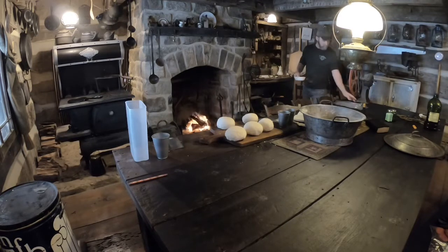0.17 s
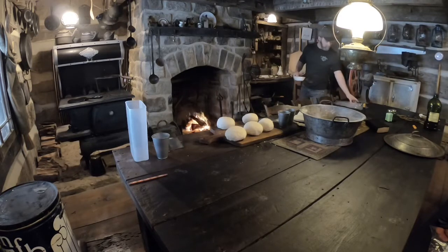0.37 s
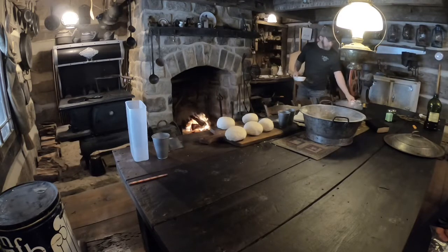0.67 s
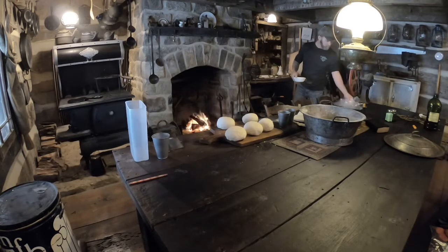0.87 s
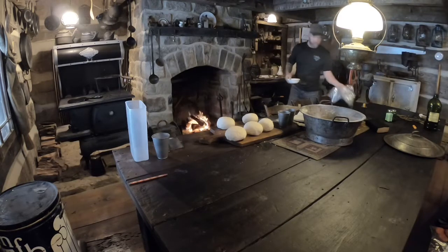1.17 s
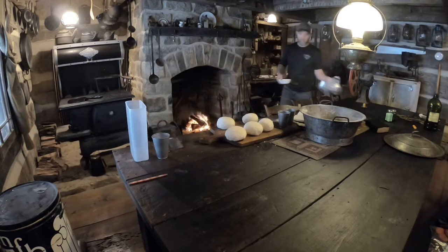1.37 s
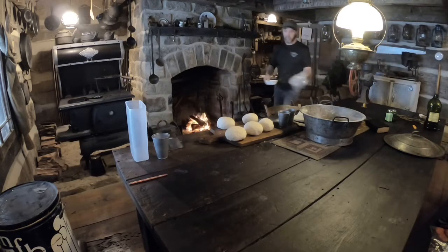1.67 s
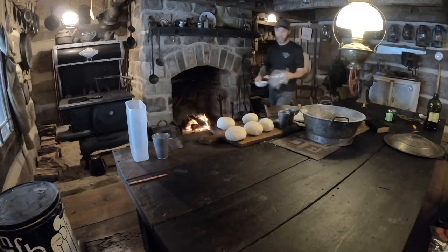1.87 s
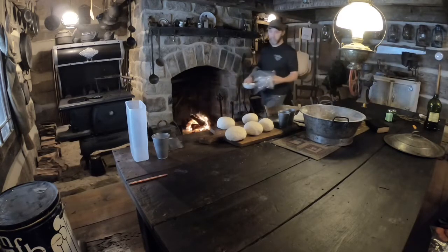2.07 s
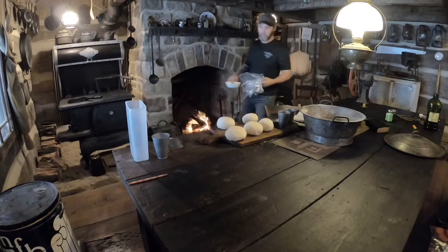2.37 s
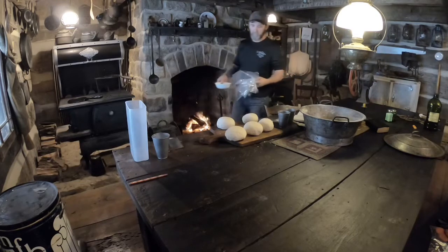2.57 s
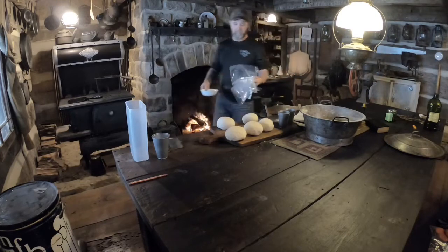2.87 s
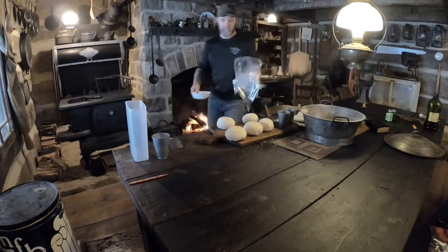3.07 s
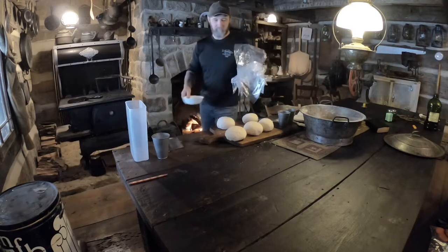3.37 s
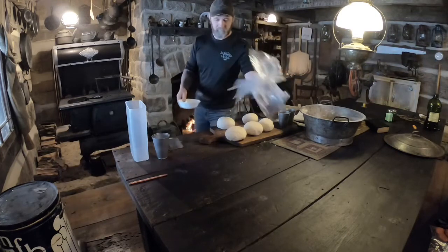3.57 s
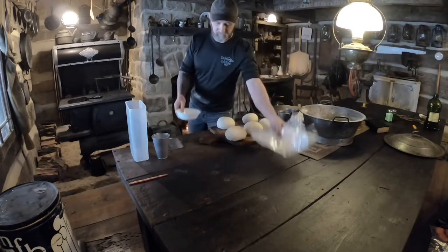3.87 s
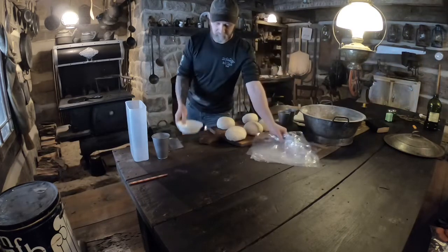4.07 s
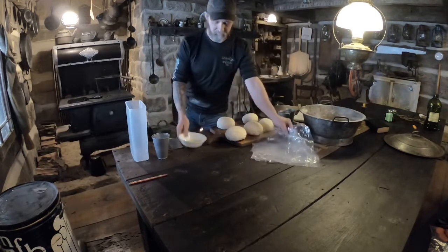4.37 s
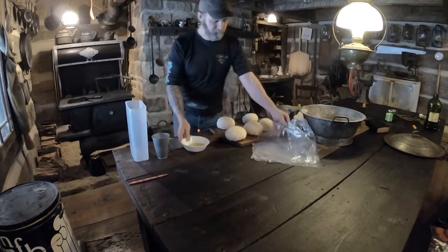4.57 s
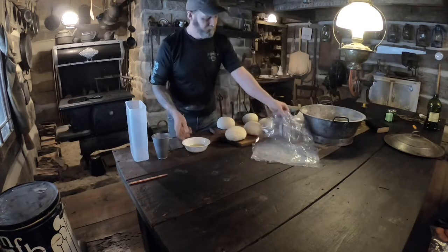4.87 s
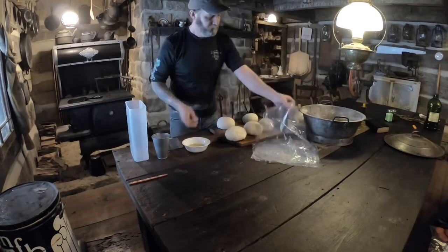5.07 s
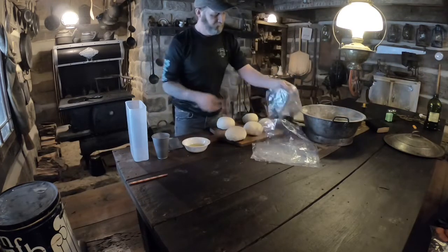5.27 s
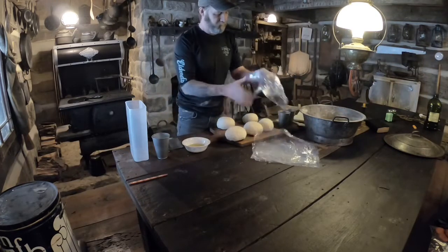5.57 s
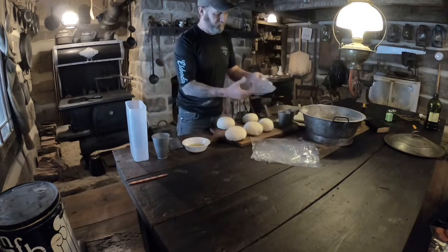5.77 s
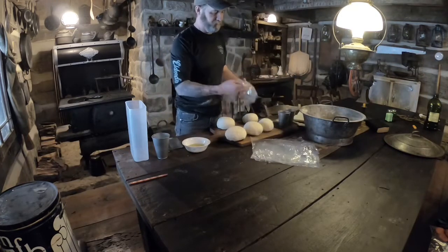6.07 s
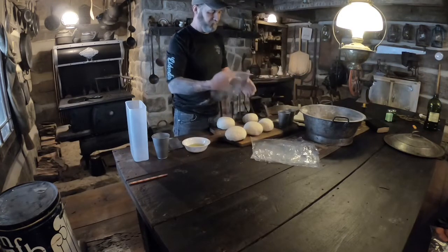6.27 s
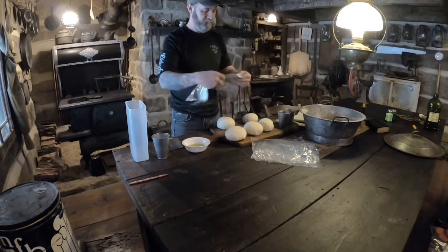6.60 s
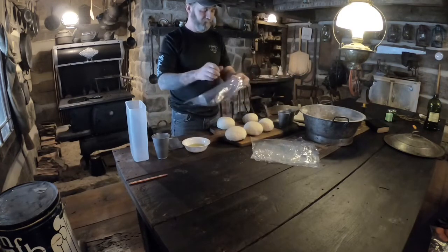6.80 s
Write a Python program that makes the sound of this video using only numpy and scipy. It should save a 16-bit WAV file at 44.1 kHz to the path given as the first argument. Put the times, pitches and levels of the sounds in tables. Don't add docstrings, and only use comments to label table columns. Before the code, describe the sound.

Faint plastic crackle and quiet steps on boards come first, then heavier creaking footfalls with low floor thumps, a barely audible cricket ticking between them. Midway a bowl hits the wooden table very near the microphone, by far the loudest sound, clattering briefly as it settles while the stone room answers with a short tail. Then film is crinkled and tugged in irregular bursts, nearer and crisper towards the end.

```python
import sys
import numpy as np
from scipy import signal
from scipy.fft import rfft, irfft
from scipy.io import wavfile
from scipy.ndimage import uniform_filter1d

SR = 44100
rng = np.random.default_rng(int(sys.argv[2]) if len(sys.argv) > 2 else 0)


def pcm_store(signal):
    levels = np.round(np.clip(np.atleast_2d(signal), -1, 1) * 32767)
    wavfile.write(sys.argv[1], SR, levels.astype(np.int16).T)


def natural_amplitude(level_db):
    exponent = np.asarray(level_db, float) / 20
    return 10 ** exponent


N = 305877

# (time [s], creak level [dB], scuff level [dB], fall per 20 dB [s])
ROLLS = [(0.36, -61.5, -60, 1), (0.831, -57, -85, -0.5), (1.158, -42.5, -65, 0.17),
         (1.33, -50.5, -64.5, 0.57), (1.883, -49, -68, 0.2), (1.952, -45, -80, 0.5),
         (2.032, -32, -49, -0.28), (2.1, -38, -65, -0.56), (2.692, -40.5, -68, 0.05),
         (2.771, -32.5, -58, 0.19), (2.94, -72, -57.5, -1), (3.399, -46, -74, -0.16),
         (3.49, -45, -59, 0.18), (3.561, -54, -75, 0), (3.9, -54.5, -68, 0.2), (4.08, -54.5, -66.5, 0.35),
         (4.497, -45.5, -53.5, 0.56), (4.96, -42.5, -71.5, 0.03)]
ROLL_RISE_S, CREAK_REST_DB, SCUFF_REST_DB = 0.055, -64.5, -74
# (frequency [Hz], width [Hz], level [dB])
BOARDS = [(152.7, 31, 2.5), (175.4, 61, -9), (230, 79, -12)]
# (frequency [Hz], density [dB per Hz])
SCUFF_SPECTRUM = [(180, -30.5), (270, 14.5), (400, 7), (550, 1.5), (800, 9), (1100, -10.5), (1600, -37)]
# (time [s], peak level [dB], ring [s], tilt [dB per octave])
HEELS = [(0.538, -39, 0.39, 3), (0.566, -40.5, 0.45, 4), (0.605, -51, 0.18, 1), (0.781, -50.5, 0.55, 3.5),
         (1.143, -50.5, 0.43, 6), (1.306, -43, 0.34, 3), (1.32, -49.5, 0.33, 8), (1.342, -41.5, 0.19, 3),
         (1.433, -49, 0.31, -8.5), (1.958, -45.5, 0.49, 10), (2.01, -36, 0.38, 6),
         (2.044, -38.5, 0.29, 1.5), (2.105, -46, 0.55, 7), (2.762, -26, 0.28, 6), (2.8, -32, 0.32, 5),
         (2.844, -48, 0.23, 17), (2.922, -47.5, 0.56, 7.5), (3.349, -46.5, 1, 6.5), (3.449, -41, 0.26, 5.5),
         (3.474, -43.5, 0.27, 5), (3.52, -47, 0.31, 4.5), (4.067, -48.5, 0.4, 7.5)]
HEEL_CONTACT_MS = 0.77
# (frequency [Hz], level [dB per Hz])
PLANKS = [(88, -41), (150, -5.5), (210, -6), (278, -2), (373, -17), (981, -31), (1570, -35.5), (1690, -41),
          (5000, -52), (6500, -86), (11000, -120)]
# (time [s], level [dB],
# frequency [Hz], t60 [s])
THUMPS = [(1.089, -39.5, 82.4, 0.48), (1.158, -43, 90, 0.14), (1.956, -39.5, 98, 0.29),
          (1.988, -29, 127, 0.095), (2.04, -26.5, 99, 0.28), (2.096, -32.5, 65, 0.25),
          (2.666, -35, 115, 0.26), (2.763, -23.5, 140.3, 0.29), (2.809, -29, 61.3, 0.22),
          (4.512, -30, 127.4, .3), (4.551, -25, 130, 0.3), (4.688, -23.5, 152, 0.087),
          (4.956, -40, 70.8, 0.84)]
THUMP_LAG_RAD = 1

# (time [s], sway level [dB], joist thud level [dB], rise per 20 dB [s], fall per 20 dB [s])
LOADS = [(0.0, -55, -59.5, .1, 2.7), (1.17, -48.5, -38.5, 0.055, 0.25), (1.36, -48.5, -44.5, .06, 0.31),
         (1.51, -45.5, -46.5, 0.11, 0.31), (2.012, -42, -35, 0.088, 0.58), (2.13, -36, -33.5, .15, 0.14),
         (2.209, -36, -37.5, 0.043, 0.092), (2.275, -43, -56, 0.045, 0.14), (2.72, -42, -35, 0.029, 0.82),
         (2.857, -33.5, -31, 0.11, 0.16), (2.95, -48, -37.5, .1, 0.27), (3.36, -34.5, -51, 0.059, 0.27),
         (3.52, -37.5, -37.5, 0.14, 0.19), (3.73, -39, -64, 0.11, 0.13), (4.49, -58, -51, .1, .1),
         (4.55, -44, -30.5, 0.043, 0.7), (4.697, -33.5, -50, .06, .05), (4.799, -56, -46.5, .1, 0.16),
         (4.998, -37.5, -28, 0.1, 0.38), (5.11, -31, -36, 0.14, 0.049), (5.2, -39.5, -65, .06, 0.26),
         (5.41, -48, -68, 0.073, 0.05), (6.84, -53.5, -77, .1, .05)]
THUD_FALL_SHARE, SWAY_REST_DB, THUD_REST_DB = 0.4, -72.5, -69.5
# (frequency [Hz], density [dB per Hz])
SWAY_SPECTRUM = [(10, -18), (18, 12), (35, 10), (52, -0.5), (70, -51.5)]
# (frequency [Hz], density [dB per Hz])
JOIST_SPECTRUM = [(40, -33.5), (58, 5), (70, 5), (90, 0), (115, -2), (150, -31)]

# (time [s], crackle level [dB], low/high
# tilt [dB], rise per 20 dB [s], fall per 20 dB [s])
GRASPS = [(0.0, -72, 0, .1, 0.13), (0.4, -58, -3, 0.14, 0.8), (0.631, -56, 3.5, 0.18, 0.055),
          (0.95, -60.5, -2, 0.64, 0.46), (1.45, -70.5, 8, 0.53, 0.3), (1.89, -70.5, 4.5, 0.14, 0.28),
          (1.991, -58.5, 8.5, 0.08, 0.1), (2.1, -65.5, 6, 0.054, 0.24), (2.927, -59, 5, 0.25, 0.11),
          (3.28, -60.5, 4, 0.034, 0.35), (3.5, -65.5, 0.5, 0.34, 0.99), (3.921, -58, -1.5, 0.12, 0.5),
          (4.25, -61, -1, 0.094, 0.082), (4.5, -60, -6, 0.31, 0.38), (4.62, -62.5, 8.5, 0.29, 0.17),
          (4.819, -61, 2.5, 0.36, 0.21), (4.97, -64, -2, 0.16, 0.67), (5.149, -60, -6.5, 0.088, 0.45),
          (5.399, -67.5, -4.5, 0.056, 0.44), (5.78, -59, -5.5, 0.12, 0.2), (6.05, -60.5, -8.5, 0.25, 0.52),
          (6.43, -62.5, 0, 0.058, 0.46), (6.59, -56.5, -4, 0.15, 0.39), (6.92, -56.5, -2, 0.17, 0.2)]
FILM_REST_DB, FILM_REST_TILT_DB = -75, -6
# (time [s], peak level
# [dB], tail t60 [s], low/high tilt [dB])
CREASES = [(0.259, -70.5, 0.6, 8), (0.345, -63, 0.3, 1), (0.781, -61, 0.54, 2), (1.2088, -63, 0.1, -3),
           (1.292, -64, .06, 3), (1.432, -63, 0.19, 11.5), (1.465, -61, 0.078, -6), (1.869, -54, 0.3, 4),
           (1.9624, -53.5, 0.13, -4), (2.762, -67.5, 0.36, 19), (2.925, -60, 0.04, -5),
           (3.258, -64.5, 0.24, 12), (3.345, -67.5, 0.63, 11.5), (3.444, -67.5, 0.28, 21.5),
           (3.485, -83, 0.21, 14), (3.741, -68, 0.056, -5), (3.783, -60, 0.24, -4), (3.872, -70, 0.052, -4),
           (3.901, -54.5, 0.46, -2), (4.337, -61, 0.04, -2.5), (4.3755, -68, 0.054, 5),
           (4.412, -58, 0.15, 3), (4.505, -40.5, 0.046, -11), (4.801, -57, 0.19, 9.5),
           (5.136, -49, 0.073, -25), (5.157, -56, 0.061, 1), (5.224, -58, 0.26, 3.5),
           (5.2976, -64.5, 0.08, -4), (5.399, -58, 0.06, 0), (5.576, -70.5, .05, -15),
           (5.662, -80, 0.06, 8), (5.689, -65, .08, 3), (5.7517, -60.5, 0.13, -3), (5.811, -55.5, 0.18, 1),
           (5.874, -57, 0.05, -10), (5.9232, -73, 0.076, 2), (5.9671, -59, 0.06, -12),
           (6.02, -50, 0.054, -8), (6.1257, -59.5, 0.38, -3), (6.217, -62, 0.26, 0.5),
           (6.295, -67, 0.04, -2.5), (6.4165, -55, 0.3, -1), (6.572, -51, 0.14, -8),
           (6.666, -58, 0.18, 2.5), (6.7942, -63, 0.06, 5), (6.8584, -57.5, 0.06, 3), (6.882, -52, 0.27, 3)]
CREASE_RISE_S = 0.0017
# (frequency [Hz], density [dB per Hz])
FILM_HIGH = [(1470, -8.5), (2500, -11), (3270, -7), (4540, -7), (5270, -5), (6160, 0), (6840, 0.5),
             (7800, -6.5), (8250, -14.5), (9300, -19), (12900, -23.5), (13900, -38), (14800, -58)]
# (frequency [Hz], density [dB per Hz])
FILM_LOW = [(400, 2.5), (800, 5), (1500, 0.5), (2200, -1.5), (3300, -4.5), (4200, -12.5), (6000, -43)]
# (time [s], gain above 10 kHz [ratio, 1 = unchanged])
NEARNESS = [
    (0, 0.4),
    (1.9, 0.5),
    (2.2, 0.1),
    (3.0, 0),
    (3.8, 0.5),
    (4.1, 1.07),
    (4.6, 0.3),
    (6.4, 0.6),
    (6.7, 1.3),
]
# (time [s], level [dB], frequency [Hz])
POPS = [(0.565, -53, 790), (0.789, -60, 1270), (1.148, -65, 857), (1.308, -61.5, 844), (1.441, -60, 1990),
        (1.878, -56, 693), (1.875, -58.5, 1160), (2.011, -52, 1013), (2.7, -66.5, 1690),
        (3.448, -49.5, 1524), (3.925, -61, 1200), (4.075, -61.5, 680), (4.732, -50, 1108),
        (4.816, -65, 2380), (4.836, -54, 3310), (5.139, -58, 3200), (5.158, -56, 3300), (5.228, -62, 3070),
        (6.882, -51.5, 2910), (6.9, -58.5, 1590)]
POP_T60_S = 0.17

# (time [s], blow level [dB], contact [ms], share reaching bowl [dB])
BLOWS = [(4.5045, -1, 0.24, -6), (4.510, -3, 0.25, 3.5), (4.516, -14.5, 0.33, -6),
         (4.525, -16.5, 0.44, -13), (4.545, -12.5, 0.28, -21), (4.577, -16, 0.24, -29),
         (4.609, -23, 0.4, -24), (4.6865, -14.5, 1, -16), (4.704, -27, 0.72, -18), (4.730, -14, 0.9, -35),
         (4.742, -35, 0.6, -29), (4.767, -27, 1.3, -31), (4.795, -42, 0.99, -33)]
TABLE_DB, BOWL_DB, THUD_DB = -19, -26, -15.5
# (frequency [Hz], level [dB], t60 [s])
TABLE_MODES = [(422, -6, 0.13), (453, -5, 0.17), (560, -14.5, 0.14), (600, -10, 0.2), (680, -15, 0.2),
               (700, 6, 0.2), (830, -4, 0.23), (917, -13.5, 0.099), (1086, -1, 0.088), (1243, -20, 0.13),
               (1285, -7.5, 0.14), (1375, -9.5, 0.085), (1780, -33.5, 0.25), (2114, -36, 0.28)]
# (frequency [Hz], level [dB], t60 [s])
BOWL_MODES = [(3350, -28, 0.04), (3503, -18, 0.12), (3593, -16.5, 0.068), (3730, -28, 0.033),
              (5880, -44, 0.058), (6070, -17, 0.06), (7400, -24, .05), (9600, -30, .02), (11800, -37, .015)]
# (frequency [Hz], level [dB per Hz])
THUD = [(200, -29), (350, -6.5), (600, 7), (900, -1.5), (1250, -9), (1500, -14.5), (2000, -24),
        (2600, -39.5), (5000, -50)]
# (frequency [Hz], level [dB], t60 [s])
PAN_MODES = [(636, -47, 1.1), (682, -57, .3), (828, -58, .4)]
# (frequency [Hz], width [Hz], level [dB])
TABLE_TOP = [(128, 120, -7.5), (184, 82, -10), (219, 10, -2), (254, 7.5, 3), (300, 14, -8.5),
             (377, 18, -12)]
SHUDDER_DB, SHUDDER_SHARE, SHUDDER_FALL_S = -24, 0.39, 0.076
# (time [s], level [dB], frequency [Hz], t60 [s])
KNOCKS = [(4.505, -15.5, 187, 0.043), (4.522, -22, 255, .06), (4.54, -28, 200, 0.065),
          (4.556, -17.5, 247, .06), (4.576, -23, 236, 0.08), (4.613, -29, 250, 0.062),
          (4.632, -26.5, 125, 0.062), (4.689, -25, 300, 0.043), (4.694, -24, 170, 0.069),
          (4.704, -25, 371, 0.066), (4.727, -28.5, 242, .07), (4.747, -24, 274.5, 0.036),
          (4.764, -28.5, 218, 0.05), (4.796, -31, 226, 0.086)]
KNOCK_CONTACT_MS = 1.57

CHIRPS = [1.714, 1.795, 1.8401, 1.9862, 2.035, 2.086, 2.3793, 2.442, 2.541, 2.5833, 2.6297, 2.674, 2.7144,
          2.7829, 2.824, 2.8762, 3.006, 3.0455, 3.128, 3.17, 3.2109]
CHIRP_HZ, CHIRP_MS, CHIRP_DB, CHIRP_SCATTER_DB = 6760, 1, -64, 1
# (frequency [Hz], density [dB per Hz])
AIR_SPECTRUM = [(11, -38), (18, -19.5), (57, -6.5), (118, -48), (161, -12), (191, -6), (354, -23),
                (419, -22), (799, -12.5), (1060, -21.5), (1480, -27.5), (2320, -42), (3400, -53),
                (5250, -47), (6950, -41), (14800, -45)]
AIR_DB = -63
ROOM_T60_S, ROOM_DB = 0.64, -6.5

# (frequency [Hz], common share [0-1])
LIKENESS = [(30, 0.44), (130, 0.31), (250, 0.085), (450, 1), (700, 0.84), (1100, 0.88), (2100, 0.23),
            (3500, 0.77), (6500, 0.1), (12000, 0.034)]
# (frequency [Hz], phase [rad], level [dB])
PORT_DIRECT = [(130, 0, 0), (200, 0, -5), (420, 0, -4), (510, -1.6, -5), (600, -3.6, -9), (700, -4.1, -5.5),
               (830, -4.5, -3), (950, -4.3, 0), (2100, -4.6, 2), (3500, -6.2, .5), (6000, -5.7, -2),
               (12000, -6.3, 0)]
# (frequency [Hz], phase [rad], level [dB])
PORT_DIFFUSE = [(130, 0, -1), (300, -3.2, -2), (1100, -3.4, -.5), (2100, -4.6, 2), (3500, -6.1, 0),
                (6000, -5.7, -3), (12000, -6.3, 0)]


def unit(x):
    return x / np.sqrt(np.mean(x ** 2))


def on_log(points, size):
    hz, value = np.transpose(points)
    return np.interp(np.log(np.fft.rfftfreq(size, 1 / SR) + 1), np.log(hz), value)


def colour(x, points):
    size = x.shape[-1]
    return irfft(rfft(x) * natural_amplitude(on_log(points, size)), size)


def ports(common, own):
    size = common.shape[-1]
    like = np.clip(on_log(LIKENESS, size), 0, 1)
    return irfft(np.sqrt(like) * rfft(common) + np.sqrt(1 - like) * rfft(own), size)


def noise():
    x = rng.standard_normal((3, N))
    return ports(x[0], x[1:])


def curves(table):
    s, *columns = np.transpose(table)
    return [np.interp(np.arange(N) / SR, s, c) for c in columns]


def add(out, s, x):
    i = int(s * SR)
    out[..., i:i + x.shape[-1]] += x[..., :N - i]


def decay(t, t60_s):
    return np.exp(-np.log(1000) * t / t60_s)


def ring(hz, db, t60_s, contact_ms, phase):
    t = np.arange(SR // 2 * 3)[:int(min(np.max(t60_s), 1.4) * SR)] / SR
    wave = np.sin(2 * np.pi * hz[:, None] * t + phase[:, None])
    modes = natural_amplitude(db)[:, None] * decay(t, t60_s[:, None]) * wave
    push = np.hanning(int(contact_ms * SR / 1000) + 3)
    return signal.fftconvolve(modes.sum(0), push / push.sum())


def dense(points, db, contact_ms, ring_s, tilt_db, count=90):
    out = np.zeros((3, SR // 2 * 3))
    point_hz, point_db = np.transpose(points)
    for row in out:
        u = rng.random((3, count))
        hz = 140 * 36 ** ((np.arange(count) + u[0]) / count)
        mode_db = np.interp(np.log(hz), np.log(point_hz), point_db)
        mode_db = mode_db + (6.5 + tilt_db) * np.log2(hz / 300)
        t60_s = max(ring_s, .03) * (300 / hz) ** 0.13 * (0.5 + 0.5 * u[1])
        x = ring(hz, mode_db, t60_s, contact_ms, 2 * np.pi * u[2])
        row[:len(x)] = x
    onset = np.minimum(np.arange(out.shape[1]) / (.0015 * SR), 1)
    x = (out[0] + .4 * out[1:]) * onset
    return x * natural_amplitude(db) / np.abs(x).max()


def resonate(x, peaks):
    f = np.fft.rfftfreq(N, 1 / SR)
    gain = sum(natural_amplitude(db) / (1 + ((f - hz) / (width / 2)) ** 2) for hz, width, db in peaks)
    return unit(irfft(rfft(x) * gain, N))


def even(x, span_s):
    size = int(span_s * SR)
    power = uniform_filter1d(uniform_filter1d((x ** 2).mean(0), size), size)
    return x / np.sqrt(power + 0.088 * np.mean(x ** 2))


def swells(s, db, rise_s, fall_s, rest_db):
    t = np.arange(0, N + 64, 64) / SR
    power = natural_amplitude(rest_db) ** 2
    for at, top_db, rise, fall in np.broadcast(s, db, rise_s, fall_s):
        away = np.maximum((at - t) / max(rise, .005), (t - at) / max(fall, .01))
        power = power + natural_amplitude(top_db - 20 * away) ** 2
    return np.interp(np.arange(N) / SR, t, np.sqrt(power))


def steps():
    s, creak_db, scuff_db, fall_s = np.transpose(ROLLS)
    creak = swells(s, creak_db, ROLL_RISE_S, fall_s, CREAK_REST_DB)
    scuff = swells(s, scuff_db, ROLL_RISE_S, fall_s, SCUFF_REST_DB)
    out = even(resonate(noise(), BOARDS), span_s=0.04) * creak
    out = out + unit(colour(noise(), SCUFF_SPECTRUM)) * scuff
    for s, db, ring_s, tilt_db in HEELS:
        add(out, s, dense(PLANKS, db, HEEL_CONTACT_MS, ring_s, tilt_db))
    for s, db, hz, t60_s in THUMPS:
        beam = hz * np.array([1, 1.37]), db - np.array([0, 5.]), t60_s * np.array([1, .7])
        for port, lag in zip(out, (0, THUMP_LAG_RAD)):
            add(port, s, ring(*beam, 3.93, np.array([lag, -lag])))
    return out


def joists():
    out = 0
    s, sway_db, thud_db, rise_s, fall_s = np.transpose(LOADS)
    sway = swells(s, sway_db, rise_s, fall_s, SWAY_REST_DB)
    thud = swells(s, thud_db, rise_s, THUD_FALL_SHARE * fall_s, THUD_REST_DB)
    for points, gain in ((SWAY_SPECTRUM, sway), (JOIST_SPECTRUM, thud)):
        x = rng.standard_normal((3, N))
        shake = x[1:] + 0.65 * x[0] * np.array([[1], [-1]])
        out = out + even(colour(shake, points), span_s=0.045) * gain
    return colour(out, [(125, 5.0), (190, -49)])


def crackle():
    snaps = (rng.random(N) < 1500 / SR) * natural_amplitude(np.minimum(2.2 * rng.exponential(size=N), 11))
    carrier = noise()
    tails = signal.lfilter([1], [1, -np.exp(-1 / (0.0084 * SR))], snaps)
    return carrier * np.sqrt(0.3 + unit(tails) ** 2)


def patchy(x, patchy_db, count):
    z = signal.stft(x, nperseg=256)[2]
    field = uniform_filter1d(rng.standard_normal(z.shape[1:]), size=count, axis=0)
    field = uniform_filter1d(field, size=6, axis=1)
    return signal.istft(z * natural_amplitude(patchy_db * unit(field)), nperseg=256)[1][:, :N]


def film():
    at, top_db, tilt_db, rise_s, fall_s = np.transpose(GRASPS)
    crisp = swells(at, top_db, rise_s, fall_s, FILM_REST_DB)
    dull = swells(at, top_db + tilt_db, rise_s, fall_s, FILM_REST_DB + FILM_REST_TILT_DB)
    burst, t = np.zeros((2, N)), np.arange(SR // 3) / SR
    for s, db, tail_s, low_db in CREASES:
        snap = decay(t, max(tail_s, .01)) + .25 * np.exp(-t / .002)
        snap = snap * np.minimum(t / CREASE_RISE_S, 1)
        add(burst, s, natural_amplitude([[db - 2.0], [db - 3.5 + low_db]]) * snap)
    high = unit(colour(patchy(crackle(), patchy_db=2.0, count=3), FILM_HIGH))
    high = np.hypot(crisp, burst[0]) * high
    low = unit(colour(patchy(crackle(), patchy_db=0.8, count=2), FILM_LOW))
    low = np.hypot(dull, burst[1]) * low
    finest = colour(high, [(9500, -30), (11500, 0)])
    return high + (curves(NEARNESS)[0] - 1) * finest + low


def pops():
    out = np.zeros(N)
    for (s, db, hz), u in zip(POPS, rng.random((len(POPS), 2, 3))):
        t60_s = POP_T60_S * 1000 / hz + np.zeros(3)
        add(out, s, ring(hz * (.92 + 0.174 * u[0]), db + np.zeros(3), t60_s, 0.2, 2 * np.pi * u[1]))
    return out


def bowl():
    out = np.zeros((2, N))
    top_hz, top_db, top_t60_s = np.transpose(TABLE_MODES)
    cup_hz, cup_db, cup_t60_s = np.transpose(BOWL_MODES)
    for s, db, contact_ms, share_db in BLOWS:
        spot = rng.integers(2, size=len(top_hz)) * np.pi
        wood = ring(top_hz, top_db + TABLE_DB + db, np.minimum(top_t60_s, .25), contact_ms, spot)
        spread = np.minimum(np.arange(len(wood)) / (0.0061 * SR), 1)
        add(out, s, wood * spread)
        add(out, s, ring(cup_hz, cup_db + BOWL_DB + db + share_db, cup_t60_s, .05, 0 * cup_hz))
        add(out, s, dense(THUD, THUD_DB + db, contact_ms, 0.37, 0.09))
    for s, *_ in BLOWS[1::6]:
        add(out, s, ring(*np.transpose(PAN_MODES), 0.44, np.zeros(3)))
    return out


def shudder():
    since = np.arange(N) / SR - BLOWS[0][0]
    gate = np.clip(since / .004, 0, 1) * np.clip((.42 - since) / .03, 0, 1)
    x = rng.standard_normal((3, N))
    s, db, *_ = np.transpose(BLOWS)
    gain = swells(s, SHUDDER_SHARE * db + SHUDDER_DB, .004, SHUDDER_FALL_S, -88)
    return gate * gain * even(resonate(x[0] + 0.65 * x[1:], TABLE_TOP), span_s=0.022)


def knocks():
    out = np.zeros(N)
    for s, db, hz, t60_s in KNOCKS:
        bend = hz * np.array([1, 1.45]), db - np.array([0, 7.]), t60_s * np.array([1, .8])
        add(out, s, ring(*bend, KNOCK_CONTACT_MS, np.zeros(2)))
    return out


def cricket():
    out, t = np.zeros((2, N)), np.arange(-150, 150) / SR
    blip = np.exp(-(t * 1000 / CHIRP_MS) ** 2 / 2) * np.sin(2 * np.pi * CHIRP_HZ * t)
    for s, db in zip(CHIRPS, CHIRP_DB + CHIRP_SCATTER_DB * rng.standard_normal(len(CHIRPS))):
        add(out, s - .002, natural_amplitude(db) * blip)
    return out


def air():
    swell = unit(uniform_filter1d(rng.standard_normal(N), size=SR // 4))
    hum = unit(colour(patchy(noise(), patchy_db=1.0, count=2), AIR_SPECTRUM))
    return hum * natural_amplitude(AIR_DB + 2.06 * swell)


def room(x):
    t = np.arange(SR // 2) / SR
    tail = rng.standard_normal((2, len(t)))
    low = colour(tail, [(100, -56), (200, 2.5), (1500, -16.0), (4000, 11)]) * decay(t, ROOM_T60_S)
    early = .5 * tail * decay(t, 0.55 * ROOM_T60_S)
    tail = (low + early) * np.minimum(t / 0.0081, 1)
    return natural_amplitude(ROOM_DB) * signal.fftconvolve(x, unit(tail) / np.sqrt(len(t)), axes=1)[:, :N]


def turn(x, table):
    hz, phase, db = np.transpose(table)
    lean = natural_amplitude(on_log(np.c_[hz, db], N) / 2)
    left = lean * np.exp(1j * on_log(np.c_[hz, phase], N))
    return irfft(rfft(x) * np.array([left, 1 / lean]), N)


def scene():
    body = joists()
    around = film() + air()
    feet = steps()
    hard = cricket() + pops() + bowl() + shudder() + knocks()
    return turn(hard + feet, PORT_DIRECT) + turn(room(hard) + around, PORT_DIFFUSE) + body


def low_pass(x):
    return signal.sosfilt(signal.butter(12, 15000, fs=SR, output="sos"), x)


def record(dry):
    rounded = np.tanh(2 * dry) / 2
    mix = colour(rounded, [(11000, 0), (13000, -1.0), (14300, -3.5), (14900, -32)])
    return low_pass(mix)


dry = scene()
out = record(dry)
pcm_store(out)
```